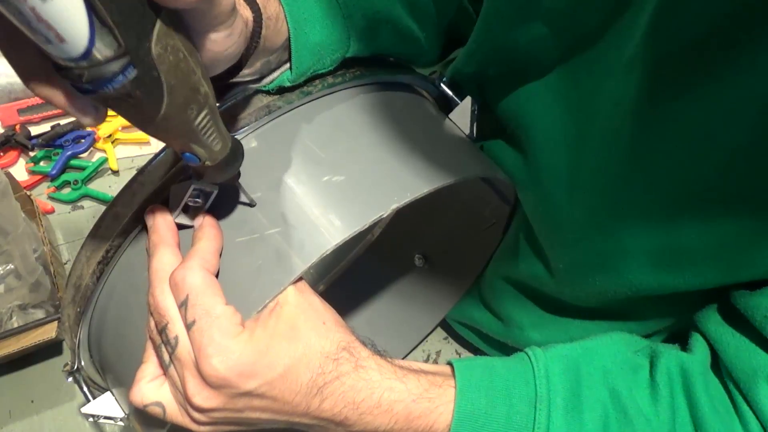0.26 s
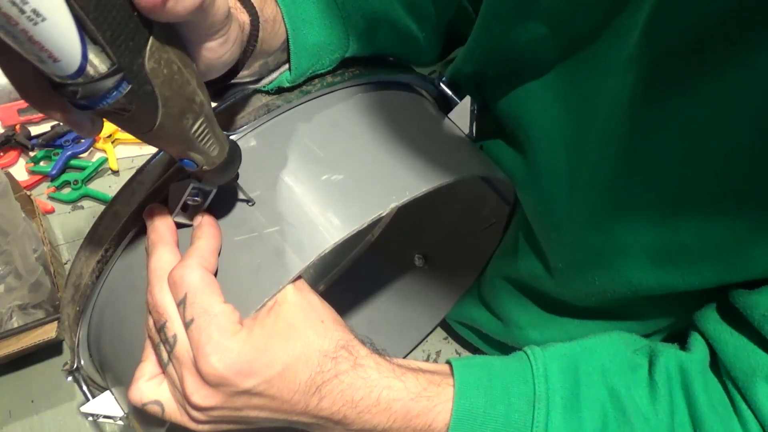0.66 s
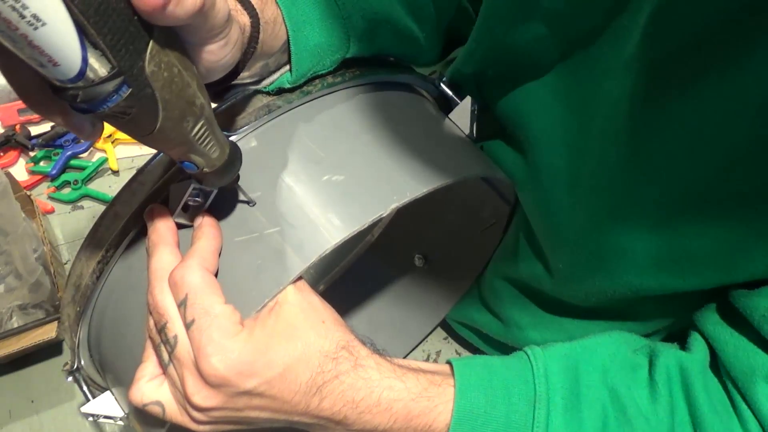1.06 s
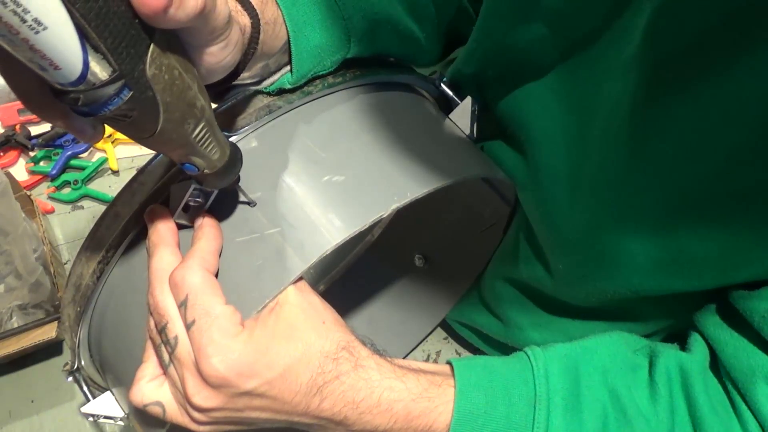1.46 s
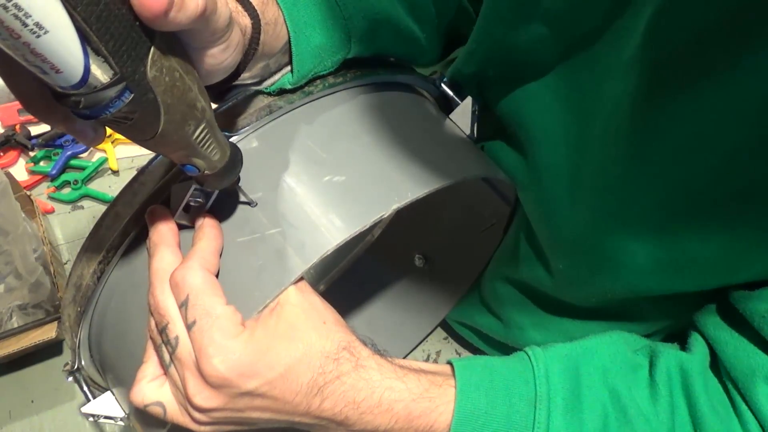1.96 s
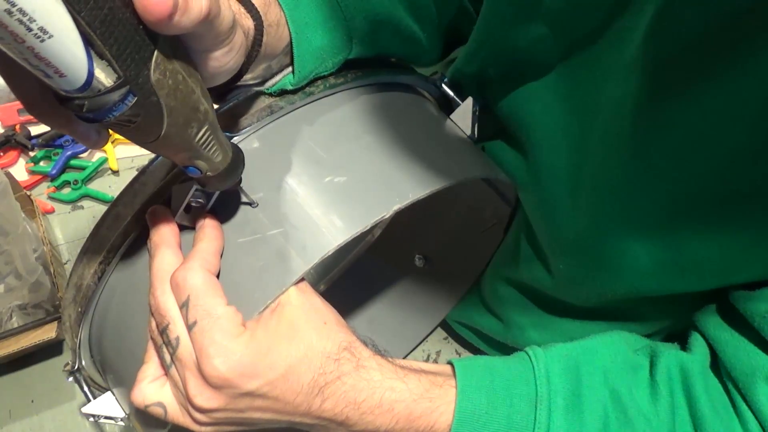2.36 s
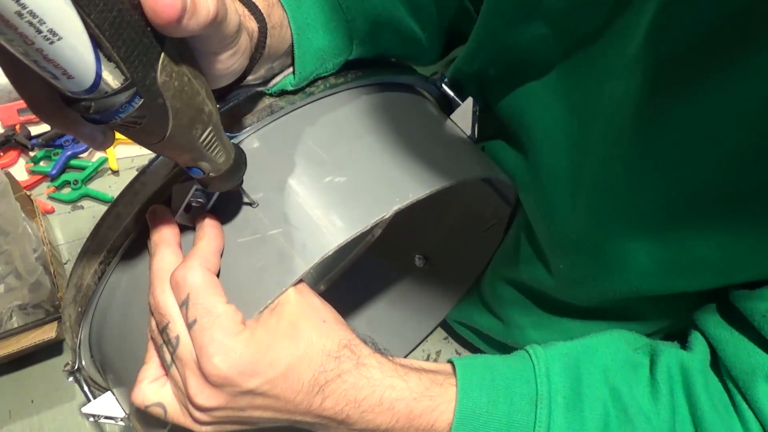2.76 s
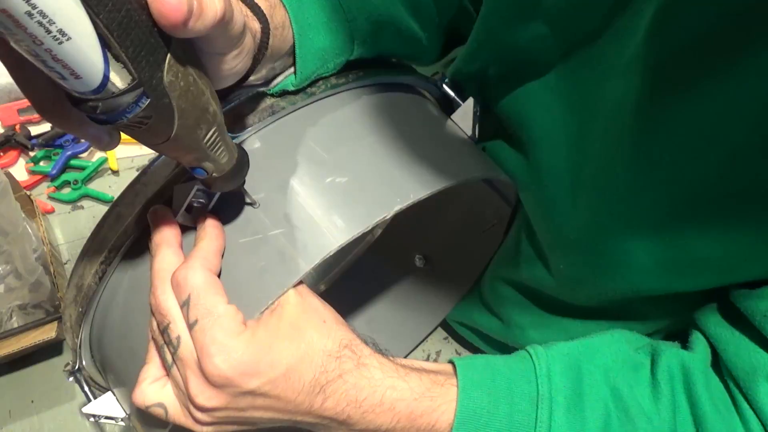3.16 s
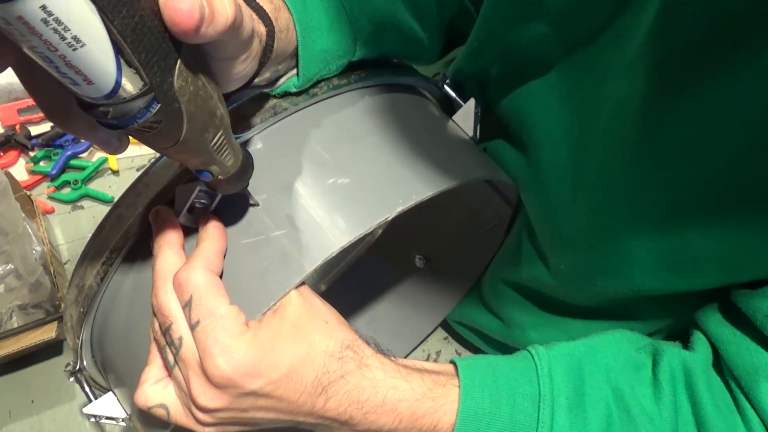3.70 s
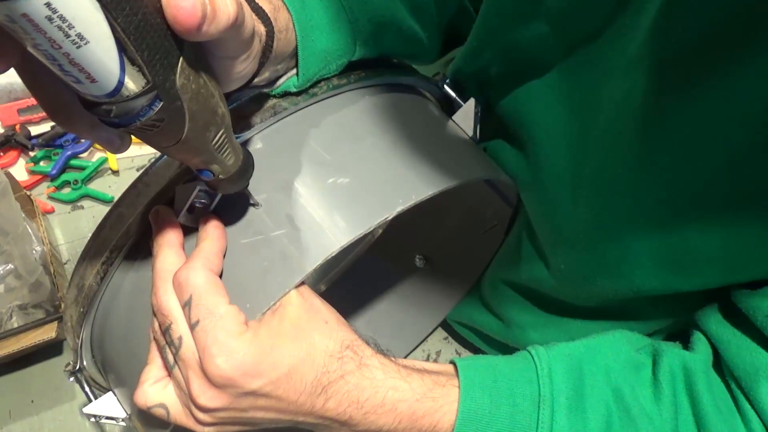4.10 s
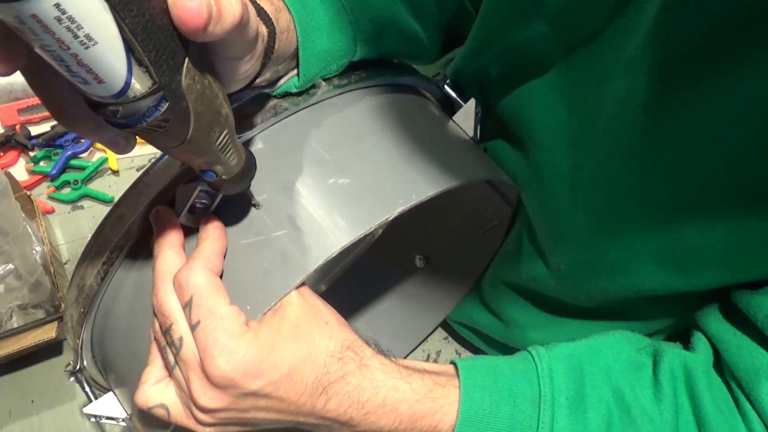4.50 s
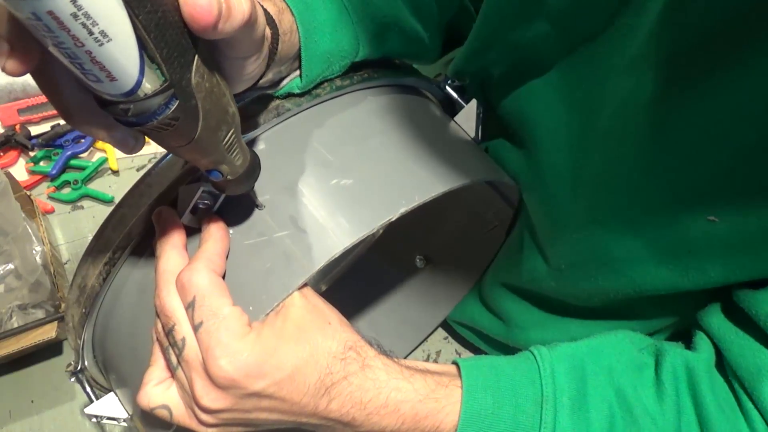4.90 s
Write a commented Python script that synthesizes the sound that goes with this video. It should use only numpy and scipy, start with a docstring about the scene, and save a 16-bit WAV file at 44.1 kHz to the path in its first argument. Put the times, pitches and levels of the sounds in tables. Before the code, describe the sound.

A handheld rotary tool runs throughout, close and slightly left, with a humming whine, rushing fan air, a fine electric sizzle and a thin high whistle. In the first 0.2 seconds its bit catches on a plastic tub with a rasp. The motor then runs almost freely, rising a little in pitch, with a few brief scrapes around 0.8 to 1 second. From about 1.3 seconds the bit sinks in, knocking so fast that it makes a rattling buzz and rings the plastic wall. The pitch starts to fall under the load. From 3 seconds the high motor tones and sizzle fade, while the whistle stays and sags slightly. The hiss of the bit rubbing in the hole grows, strongest around 4.2 seconds, as the rattle weakens. By 5 seconds the labouring motor is about an octave lower, still running. The workbench adds only very short reflections.

```python
"""A handheld rotary tool cuts into a plastic tub, over the rush of its fan and the sizzle of its brushes.
At first the bit catches with a rasp, then runs almost free: the shaft sings on multiples of its speed,
a bearing adds a tone between them and a thin whistle rides above. From 1.3 s the bit sinks in, knocking
once a turn and ringing the wall, and the load slows the shaft. From 3 s the high motor tones are faint
and the hiss of the bit rubbing in the hole grows; by the end the speed has halved."""
import sys
import numpy as np
from scipy import signal
from scipy.fft import rfft, irfft, next_fast_len
from scipy.io import wavfile

SR = 44100
rng = np.random.default_rng(int(sys.argv[2]) if len(sys.argv) > 2 else 0)


def output_pcm(signal):
    """Save a mono or channel-first signal as 16-bit PCM at the path in sys.argv[1].

    Samples are clipped to [-1, 1] before scaling.
    """
    pcm = np.clip(np.atleast_2d(signal).T, -1, 1) * 32767
    wavfile.write(sys.argv[1], SR, np.round(pcm).astype(np.int16))


N = 227011
FFT_SIZE = next_fast_len(N + 8192)
BIN_HZ = np.maximum(np.arange(FFT_SIZE // 2 + 1) * SR / FFT_SIZE, 1)
FULL_SPEED_HZ = 182


def amp(db):
    """dB to gain."""
    return 10 ** (np.asarray(db) / 20)


def unit_rms(x):
    """Scaled to rms 1."""
    return x / np.sqrt(np.mean(x ** 2) + 1e-20)


def add_power(db, power):
    """A level in dB with more power added."""
    return 10 * np.log10(amp(db) ** 2 + power)


def curves(rows):
    """Columns of a time table, one value a sample."""
    times_s, *columns = np.transpose(rows)
    return [np.interp(np.arange(N) / SR, times_s, column) for column in columns]


def spectrum_db(rows):
    """A (Hz, dB) table on the FFT grid."""
    hz, db = np.transpose(rows)
    return np.interp(np.log(BIN_HZ), np.log(hz), db)


def filtered(x, gain):
    """x through a gain per FFT bin."""
    return irfft(rfft(x, FFT_SIZE) * gain, FFT_SIZE)[:N]


def drift(rate_hz):
    """Slow random wander, rms 1."""
    pole = np.exp(-2 * np.pi * rate_hz * 64 / SR)
    slow = signal.lfilter([1], [1, -2 * pole, pole * pole], rng.standard_normal(N // 64 + 2002))[2000:]
    return np.interp(np.arange(N) / 64, np.arange(len(slow)), unit_rms(slow - slow.mean()))


def tone(angle, db, waver_db, waver_hz):
    """A sine whose rms level wavers around db."""
    gain = np.sqrt(2) * amp(db + waver_db * drift(waver_hz))
    return gain * np.sin(angle + rng.uniform(0, 2 * np.pi))


def pulsed_noise(angle, colour_db, pulse_db, flicker_db):
    """Coloured noise that swells once a turn and flickers; rms 1."""
    swell = amp(pulse_db * np.cos(angle) + flicker_db * drift(31))
    return unit_rms(filtered(swell * rng.standard_normal(N), amp(colour_db)))


def held_power(start_s, length_s, first_db, last_db, rise_s, fall_s):
    """Power of a sound that rises, holds while its level slides, and falls."""
    age_s = np.arange(N) / SR - start_s
    gate = np.clip(np.minimum(age_s / rise_s, (length_s - age_s) / fall_s) + .5, 0, 1)
    level_db = first_db + (last_db - first_db) * np.clip(age_s / length_s, 0, 1)
    return (gate * amp(level_db)) ** 2


# Fan air. Each row: frequency in Hz, relative density in dB.
FAN_SPECTRUM = [(30, -30), (100, -25), (250, -15), (640, -8), (1200, -10), (2300, -3), (3400, -2),
                (6600, -8), (8300, -4.5), (9300, 0.5), (11000, -0.5), (12100, -6.5), (13400, -9),
                (14300, -28.5), (15600, -21)]


def fan(angle, speed_hz):
    """Rushing air, 2 dB weaker per halving of speed."""
    level_db = -40 + 2.0 * np.log2(speed_hz / FULL_SPEED_HZ)
    return amp(level_db) * pulsed_noise(angle, spectrum_db(FAN_SPECTRUM), pulse_db=1.0, flicker_db=1.4)


# Brush noise. Each row: frequency in Hz, relative density in dB.
BRUSH_SPECTRUM = [(9000, -40), (12500, -12), (13800, 5), (14500, 2), (15600, -6)]
# Fade of brushes and whine under load. Each row: time in seconds, gain in dB.
MOTOR_FADE = [(0, -7), (.2, -6), (.3, -1), (.7, -1), (1.2, -2), (1.5, -4.5), (2.3, -6.5), (2.8, -13),
              (3.3, -29), (5.15, -40)]


def brushes(angle):
    """The motor brushes sizzle, fading as the tool slows."""
    level_db = -47 + curves(MOTOR_FADE)[0]
    return amp(level_db) * pulsed_noise(angle, spectrum_db(BRUSH_SPECTRUM), pulse_db=1.6, flicker_db=2.2)


# Motor tones at shaft multiples 16, 17, 18 and up. Each entry: level in dB before the fade.
WHINE_DB = [-54, -58, -52, -51, -58, -58, -56, -54, -58, -46, -58, -56, -59, -59, -55, -57, -54, -60, -55,
            -57, -57, -61, -66, -66, -64, -57, -61, -62, -59, -53, -53, -63, -63, -59, -62, -49, -55, -54,
            -60, -55, -54, -54, -53, -51, -55, -56, -60, -60, -58, -60]


def motor_whine(angle):
    """High motor tones, clearest while the tool runs free."""
    tones = sum(tone(k * angle, db, waver_db=2.5, waver_hz=5) for k, db in enumerate(WHINE_DB, start=16))
    return tones * amp(0.46 * drift(19) + curves(MOTOR_FADE)[0])


# Each row: time in seconds, pitch in Hz.
WHISTLE_PITCH = [(0, 7356), (.3, 7362), (.51, 7381), (1.26, 7390), (2.46, 7315), (2.91, 7247), (3.21, 7144),
                 (3.36, 7076), (3.51, 7050), (3.7, 7045), (4.6, 6735), (4.86, 6587), (5.01, 6430),
                 (5.15, 6480)]
# Each row: time in seconds, level in dB.
WHISTLE_LEVEL = [(0, -50), (.25, -49), (.36, -42.5), (.9, -49), (1.7, -50), (2.2, -43.5), (2.76, -44.5),
                 (3.1, -39.5), (3.66, -42.5), (3.8, -40), (4.55, -47), (4.66, -39.5), (5.15, -38)]


def whistle():
    """A thin high tone that sags with the load and trembles in pitch."""
    pitch_hz = curves(WHISTLE_PITCH)[0] + 3.6 * drift(49)
    return tone(2 * np.pi * np.cumsum(pitch_hz) / SR, curves(WHISTLE_LEVEL)[0], waver_db=1.6, waver_hz=26)


# Course of the cut. Each row: time in seconds, then hum swell, knock, rasp and hiss in dB.
CUT_LEVELS = [(0, 7.5, -37.5, -45, -43), (.21, 5.5, -42, -37.5, -46), (.28, -4, -42, -45.5, -55),
              (.72, -4.5, -79, -46, -39.5), (1.11, 3, -40, -39.5, -57), (1.18, 6, -37, -43, -45),
              (1.43, 2, -33.5, -41, -37.5), (1.6, 7.5, -31, -38, -40.5), (1.95, 3.5, -30, -34.5, -36.5),
              (1.99, 5, -39.5, -41.5, -44), (2.4, 2, -35.5, -38.5, -38.5), (2.78, -1, -35.5, -35.5, -36),
              (2.83, 2, -34.5, -37, -32.5), (3.4, -0.5, -36, -40.5, -31.5), (3.72, -0.5, -36, -38, -31),
              (3.98, -2, -38, -41.5, -26), (4.22, -2, -47, -39, -24), (4.42, 0.5, -48, -38, -25.5),
              (4.62, -0.5, -57, -37.5, -29.5), (4.9, -1.5, -49, -35.5, -29.5),
              (5.15, -0.5, -50, -38.5, -30)]
# The bit catches and lets go. Each row: start and length in seconds, then knock, rasp and hiss in dB.
CATCHES = [(0.018, 0.038, -40, -36.5, -48), (0.129, 0.043, -38, -36, -38.5),
           (0.172, 0.049, -33, -35.5, -41), (0.751, 0.027, -58, -31, -50), (0.865, 0.072, -57, -35, -59),
           (0.943, 0.12, -47, -36, -64), (1.028, .045, -62, -46, -55), (1.457, 0.043, -30, -37, -51),
           (1.783, 0.051, -34, -35, -37.5), (1.907, 0.045, -47, -38, -45), (1.98, 0.046, -54, -37, -41)]


def cut_levels():
    """Hum swell, then knock, rasp and hiss with the catches added, in dB."""
    swell_db, *steady_db = curves(CUT_LEVELS)
    caught = np.zeros((3, N))
    for start_s, length_s, *levels_db in CATCHES:
        caught += [held_power(start_s, length_s, db, db, rise_s=0.0013, fall_s=0.004) for db in levels_db]
    return swell_db, *add_power(steady_db, caught)


# Resonances and dips of bit and chuck. Each row: frequency in Hz, relative height in dB.
BIT_RESONANCES = [(2239, 8), (2583, 4), (2971, 5), (3316, 4), (3703, -4), (4005, 4), (4392, 3), (4995, -6),
                  (5340, 4), (6072, 4), (6589, 4), (6718, -5), (7278, -6), (7622, 5), (7924, 4), (8527, -6),
                  (8957, 2), (10077, 5), (10422, -4), (10900, 3), (11240, -4), (11627, 8), (12144, 3),
                  (14470, -4)]
# Friction noise before the resonances. Each row: frequency in Hz, relative density in dB.
HISS_SPECTRUM = [(1060, -36), (1800, -94), (2220, -9), (2420, -11), (3000, -7), (3800, -9), (4900, -9.5),
                 (6090, 0), (7700, -2), (8580, -6), (11200, -1.5), (12600, -17.5), (15600, -21)]
RASP_SPECTRUM = [(71, -56), (120, -32), (330, -9), (599, -8.5), (908, 1.5), (1330, -1), (2200, 0),
                 (3040, -9), (4450, -5), (6990, -10), (9000, -51.5), (11700, -48), (19800, -120)]


def bit_friction(angle, hiss_db, rasp_db):
    """The bit hisses as it rubs and rasps as it catches, both through its resonances."""
    modes_db = sum(db / (1 + ((BIN_HZ - hz) / 90) ** 2) for hz, db in BIT_RESONANCES)
    hiss = pulsed_noise(angle, spectrum_db(HISS_SPECTRUM) + 0.84 * modes_db, pulse_db=0.97, flicker_db=0.91)
    rasp = pulsed_noise(angle, spectrum_db(RASP_SPECTRUM) + modes_db, pulse_db=0.41, flicker_db=1.1)
    return amp(hiss_db) * hiss + amp(rasp_db) * rasp


# Blows seat on the wall. Each row: start and length in seconds, first and last level in dB.
WALL_RINGS = [(0, 0.12, -60, -50), (.17, 0.03, -30, -35), (1.252, 0.026, -41, -32),
              (1.32, 0.15, -31.5, -38), (1.787, 0.06, -37, -43), (2.54, 0.06, -43, -42),
              (2.74, 0.036, -44, -46)]


def wall_ring(strike_angle, mode_hz=2200, width_hz=330):
    """The blows ring the wall's strongest mode."""
    drive = sum(np.cos(k * strike_angle) for k in range(9, 19))
    ring = filtered(drive, 1 / (1 + (2 * (BIN_HZ - mode_hz) / width_hz) ** 2))
    faint_ring = (0, 2.5, -49.5, -49.5)  # until the bit is through and damps the wall
    power = sum(held_power(*row, rise_s=0.017, fall_s=0.0085) for row in [faint_ring, *WALL_RINGS])
    return np.sqrt(power) * unit_rms(ring)


# The struck tub. Each row: frequency in Hz, relative gain in dB.
KNOCK_SPECTRUM = [(1300, 5.5), (1800, 10), (2600, 6.5), (3800, 5.5), (5200, 3), (6500, -0.5), (8000, -19),
                  (9500, -30)]


def bit_knocks(angle, knock_db):
    """One blow a turn, with the wall's ring; its shape changes as the edge finds new plastic."""
    strike_angle = angle + 0.056 * drift(16.3)  # slightly early or late
    blows = sum(amp(2.2 * drift(4)) * np.cos(k * strike_angle + rng.normal(0, 1.15))
                for k in range(10, 46) if k not in HUM_MULTIPLES)
    knocks = unit_rms(filtered(blows, amp(spectrum_db(KNOCK_SPECTRUM))))
    return amp(knock_db) * knocks + wall_ring(strike_angle)


# Each entry: cycles per shaft turn; 4.435 is the bearing's balls passing the race.
HUM_MULTIPLES = (1, 2, 3, 4, 4.435, 5, 6, 7, 8, 9, 12, 13, 15)
# One row a multiple, before the swell. Each row: full-speed level in dB, dB gained per halving of speed.
HUM_LEVELS = [(-69, -1.5), (-61.0, 1.5), (-53, -7), (-50.5, -15), (-57.5, 6), (-45, -11.5), (-48, -6),
              (-52, -3), (-52.5, 7), (-51, 3), (-48, -4), (-54.5, -13), (-50, 0.5)]
# The wall takes up one tone. Each row: start and length in seconds, multiple, first and last level in dB.
WALL_SINGING = [(0, 0.3, 2, -57, -55), (0, 0.21, 3, -65, -38), (0, 1.14, 4, -55.5, -43),
                (.03, .18, 13, -37.5, -37), (0.132, 0.42, 6, -31.5, -50), (.23, 0.74, 15, -44.5, -49),
                (0.244, 0.16, 12, -41, -50), (.3, .55, 7, -51, -52), (.5, 0.3, 12, -58, -42),
                (0.874, 1.3, 5, -45, -48), (0.925, 0.48, 4, -54, -37.5), (1.105, 0.41, 8, -46, -37.5),
                (1.135, 0.19, 3, -44, -39.5), (1.142, 0.31, 1, -56, -49.5), (1.31, 0.14, 12, -34, -29),
                (1.31, 0.11, 13, -37, -42), (1.33, 0.14, 7, -42, -35), (1.455, 0.49, 9, -47, -34),
                (1.413, 0.14, 2, -50, -41), (1.655, 0.57, 2, -54, -41.5), (2.2, 0.7, 2, -53, -50),
                (1.481, 0.583, 4, -34.5, -37), (1.501, 0.496, 6, -34, -33), (1.568, 0.494, 3, -46, -36.5),
                (1.77, 0.26, 15, -39, -37), (1.963, 0.47, 8, -37.5, -37), (2.033, 0.54, 4.435, -38, -35),
                (2.07, 0.6, 13, -39.5, -47), (2.1, 0.52, 7, -38.5, -46), (2.139, 0.41, 6, -54, -39.5),
                (2.197, 0.14, 15, -40, -38), (2.498, 0.28, 15, -37.5, -43), (2.45, 0.26, 9, -56, -51),
                (2.62, 0.34, 5, -43, -39), (2.647, 0.18, 7, -34.5, -42), (2.66, 0.17, 12, -45, -39),
                (2.576, 0.24, 4.435, -43, -40), (2.796, 0.45, 4.435, -34, -35.5),
                (2.92, 0.43, 6, -43.5, -35), (3.355, .6, 6, -40, -40.5), (3.0, 1.34, 1, -61, -59.5),
                (3.093, 1.27, 13, -47.5, -45.5), (3.286, 0.71, 4.435, -45.5, -42.5),
                (3.997, .22, 4.435, -43.5, -45), (3.342, 0.85, 7, -39, -38), (4.156, 0.52, 7, -41.5, -51),
                (3.7, 0.26, 2, -67, -58), (4.27, 0.16, 2, -55, -54), (4.273, .2, 3, -47, -54),
                (4.436, 0.25, 4.435, -52, -40), (4.6, .45, 1, -64, -60), (4.695, 0.18, 8, -45, -43),
                (4.887, .2, 3, -50, -44.5), (4.933, 0.21, 4, -49.5, -41.5), (4.95, 0.12, 2, -49, -51),
                (5.003, 0.19, 5, -46, -41.5)]
# Shaft wobble. Each entry: dB relative to the bearing tone, one multiple below it, then one above.
SIDEBANDS_DB = (-25, -14)


def shaft_hum(angle, speed_hz, swell_db):
    """Shaft and bearing tones follow speed and cut, and are louder while the wall sings them."""
    halvings = np.log2(FULL_SPEED_HZ / speed_hz)
    levels_db = {k: db + slope_db * halvings + swell_db
                 for k, (db, slope_db) in zip(HUM_MULTIPLES, HUM_LEVELS)}
    for start_s, length_s, k, first_db, last_db in WALL_SINGING:
        sung = held_power(start_s, length_s, first_db, last_db, rise_s=0.027, fall_s=0.062)
        levels_db[k] = add_power(levels_db[k], sung)
    waver_db = 1.4 + 1.6 * halvings  # a labouring shaft runs less evenly
    hum = sum(tone(k * angle, db, waver_db, waver_hz=11.3) for k, db in levels_db.items())
    bearing = HUM_MULTIPLES[4]
    for k, db in zip((bearing - 1, bearing + 1), SIDEBANDS_DB):
        hum += tone(k * angle, levels_db[bearing] + db, waver_db=0.47, waver_hz=15)
    return hum


# Each row: time in seconds, shaft speed in turns per second.
SHAFT_SPEED = [(0.0, 171.5), (0.14, 168.5), (0.21, 163.0), (0.238, 168.6), (0.388, 175.8), (0.538, 179.7),
               (0.738, 181.9), (1.09, 181.0), (1.19, 182.5), (1.29, 182.0), (1.4, 179.7), (1.52, 175.8),
               (1.76, 171.4), (2.04, 163.6), (2.2, 162.4), (2.5, 157.9), (2.59, 155.4), (3.0, 138.4),
               (3.27, 124.9), (3.37, 121.8), (3.47, 120.1), (3.67, 120.1), (3.78, 118.9), (4.18, 110.2),
               (4.59, 103.0), (4.69, 99.7), (4.8, 97.0), (4.86, 94.3), (5.03, 93.1), (5.08, 87.5),
               (5.15, 87.3)]
# Bench echoes, opposite in left and right. Each row: frequency in Hz, dB relative to the direct sound.
BENCH_ECHO = [(60, -50), (250, -15.5), (500, -18.5), (1000, -11), (2000, -17), (4000, -17.5), (8000, -14),
              (12000, -30.5)]
# Each row: frequency in Hz, left minus right in dB.
BALANCE = [(200, -.2), (500, .8), (1000, 1.5), (4000, 1.7), (8000, .3), (12000, .1)]


def scene():
    """All sources, heard a little left, with short echoes from the bench."""
    speed_hz = curves(SHAFT_SPEED)[0]
    angle = 2 * np.pi * np.cumsum(speed_hz) / SR
    swell_db, knock_db, rasp_db, hiss_db = cut_levels()
    tool = bit_friction(angle, hiss_db, rasp_db) + fan(angle, speed_hz) + brushes(angle)
    tool += shaft_hum(angle, speed_hz, swell_db) + motor_whine(angle)
    tool += bit_knocks(angle, knock_db) + whistle()
    echo_t60_s = 0.25
    echo = rng.standard_normal(8192) * amp(-60 * np.arange(8192) / (echo_t60_s * SR))
    side = filtered(tool, amp(spectrum_db(BENCH_ECHO)) * rfft(echo / np.linalg.norm(echo), FFT_SIZE))
    lean_db = spectrum_db(BALANCE) / 2
    return np.array([filtered(tool, amp(lean_db)) + side, filtered(tool, amp(-lean_db)) - side])


def record(dry):
    """Steep low-pass at 15720 Hz."""
    return signal.sosfilt(signal.ellip(16, .3, 80, 15720, fs=SR, output="sos"), dry)


dry = scene()
out = record(dry)
output_pcm(out)
```